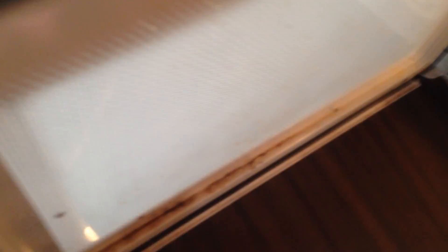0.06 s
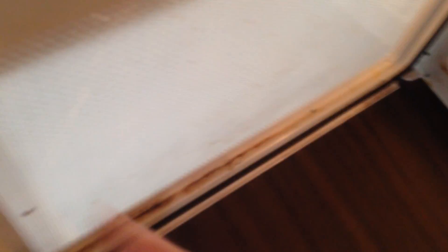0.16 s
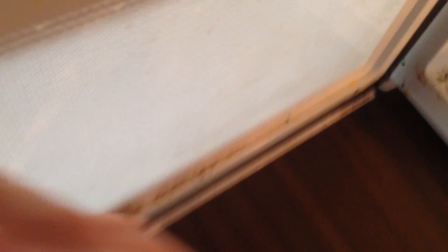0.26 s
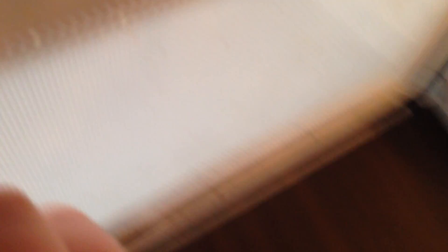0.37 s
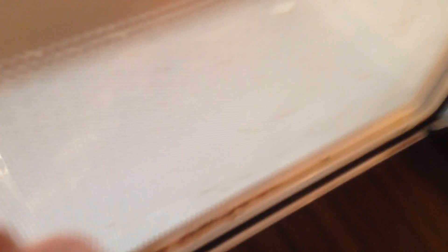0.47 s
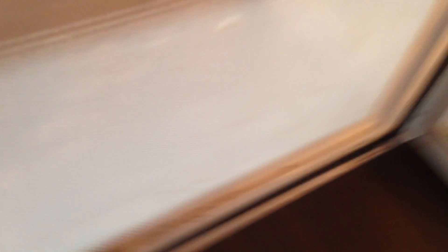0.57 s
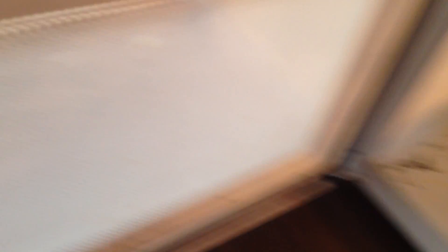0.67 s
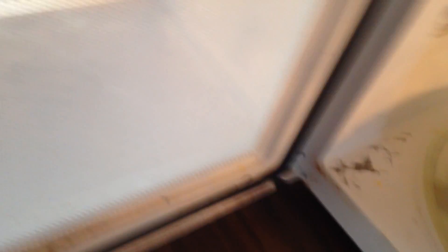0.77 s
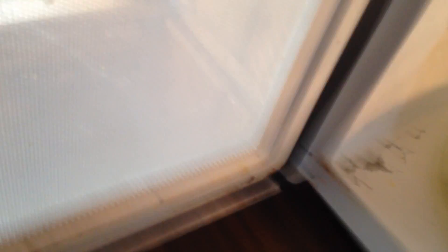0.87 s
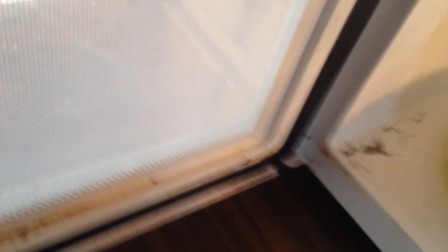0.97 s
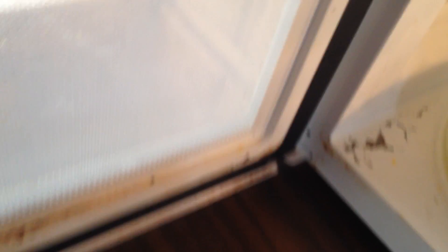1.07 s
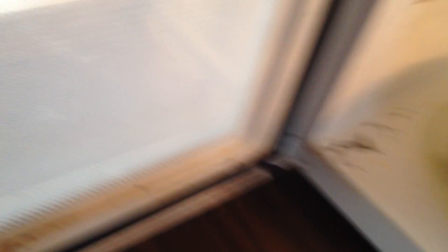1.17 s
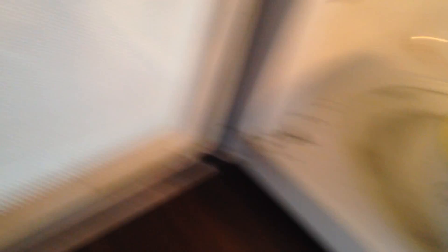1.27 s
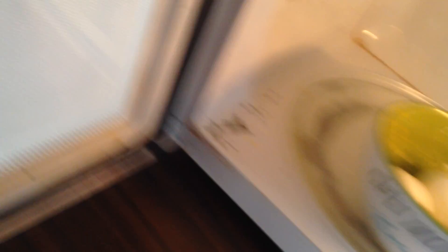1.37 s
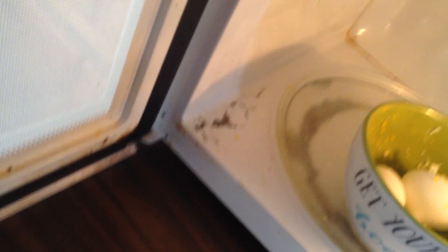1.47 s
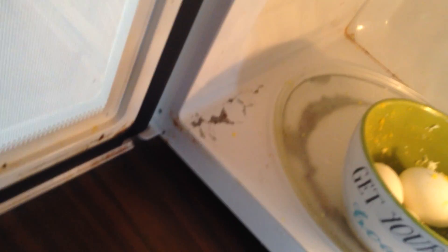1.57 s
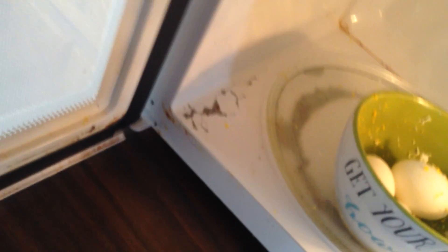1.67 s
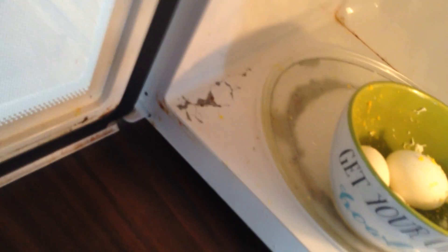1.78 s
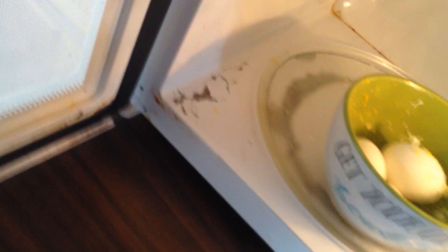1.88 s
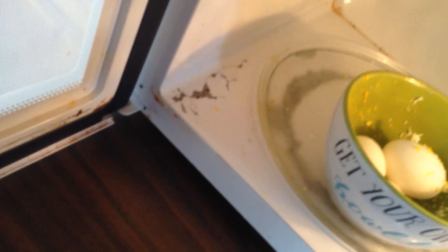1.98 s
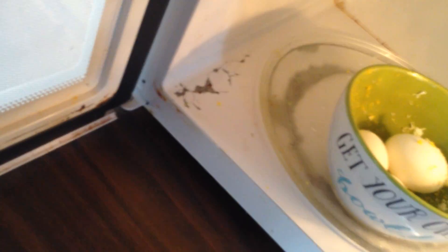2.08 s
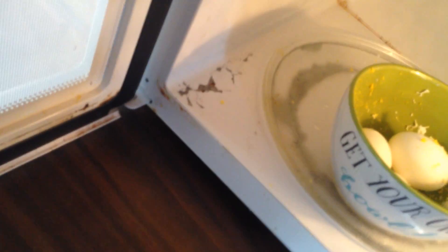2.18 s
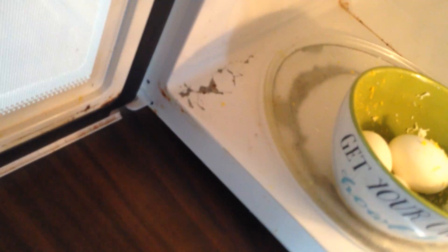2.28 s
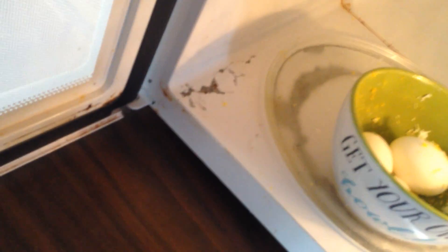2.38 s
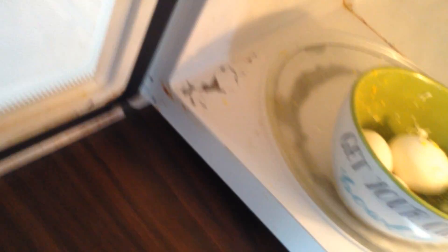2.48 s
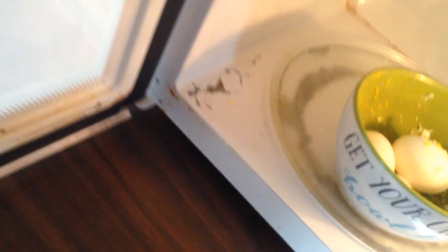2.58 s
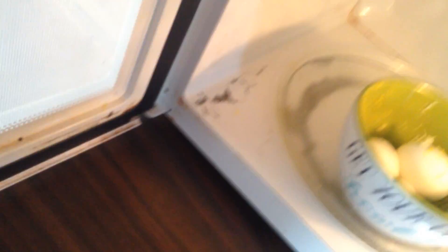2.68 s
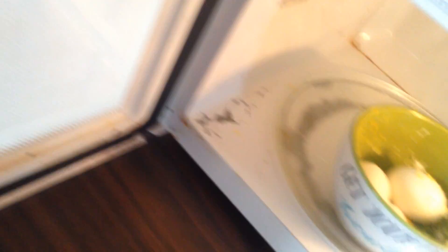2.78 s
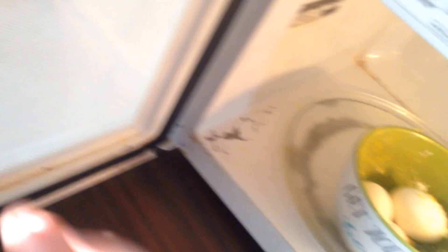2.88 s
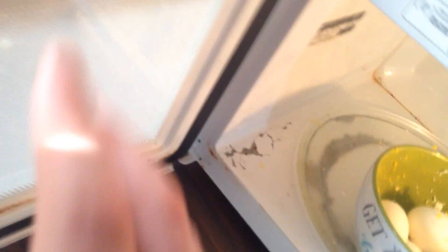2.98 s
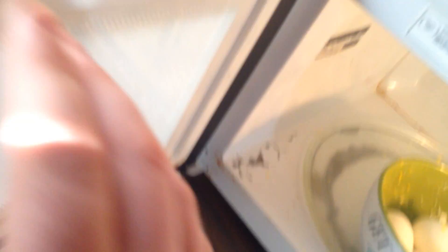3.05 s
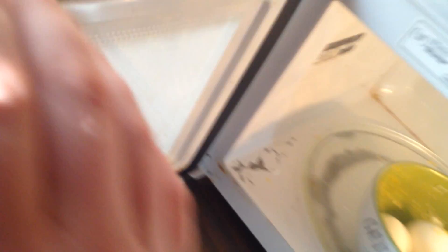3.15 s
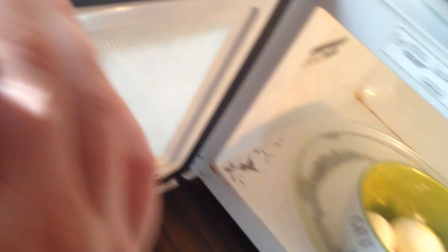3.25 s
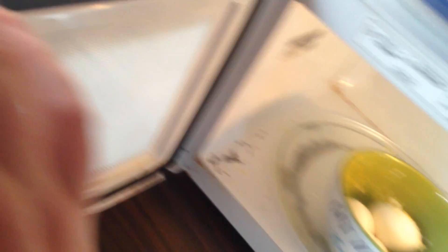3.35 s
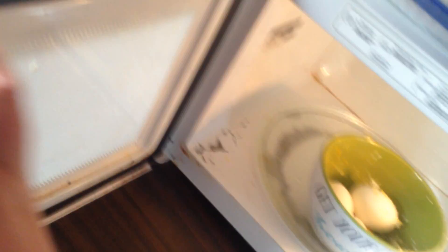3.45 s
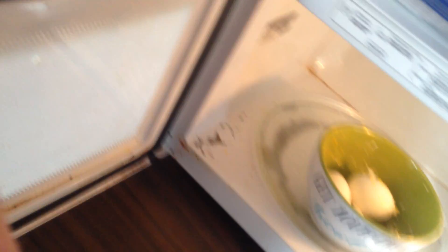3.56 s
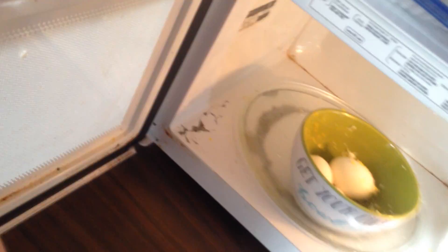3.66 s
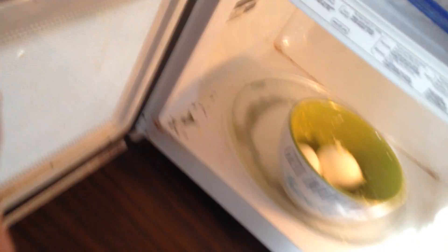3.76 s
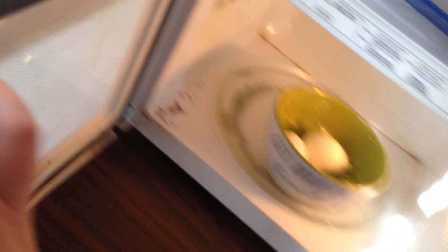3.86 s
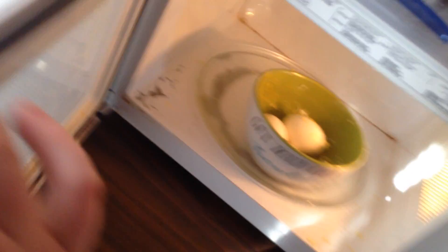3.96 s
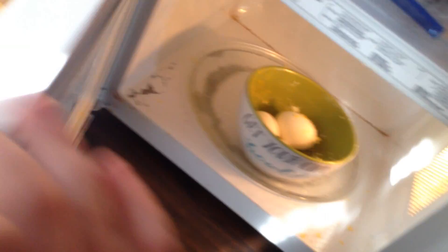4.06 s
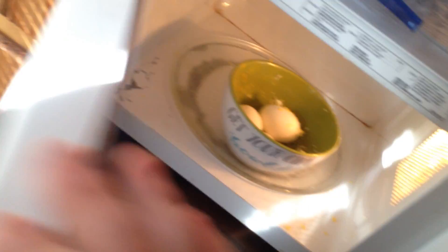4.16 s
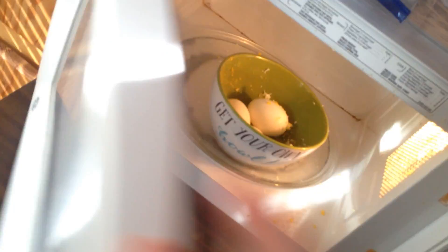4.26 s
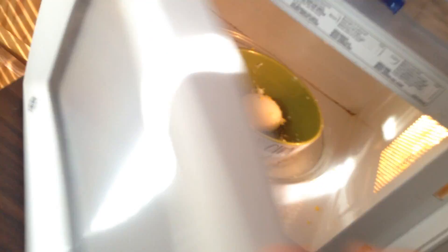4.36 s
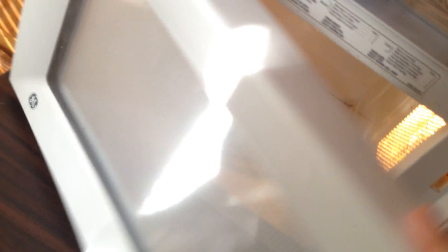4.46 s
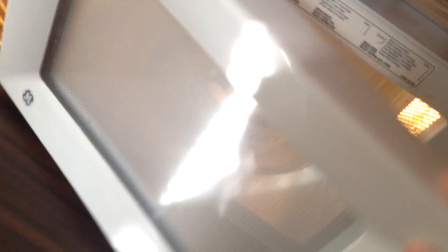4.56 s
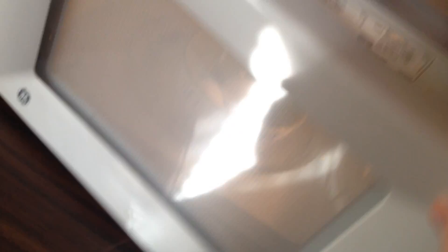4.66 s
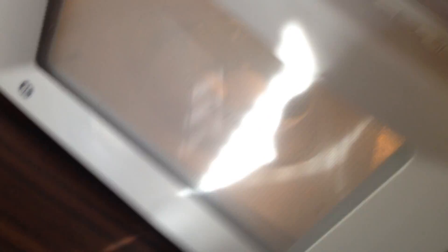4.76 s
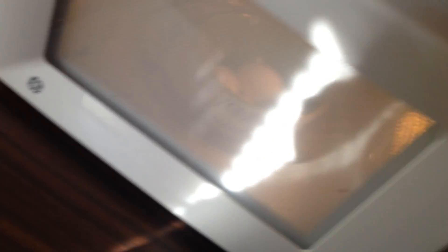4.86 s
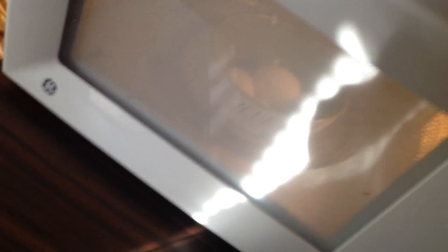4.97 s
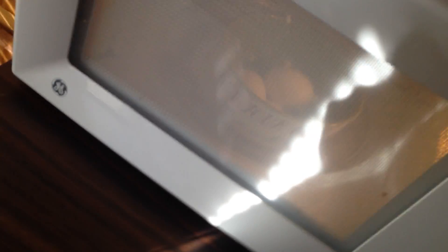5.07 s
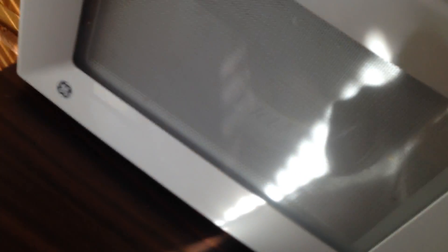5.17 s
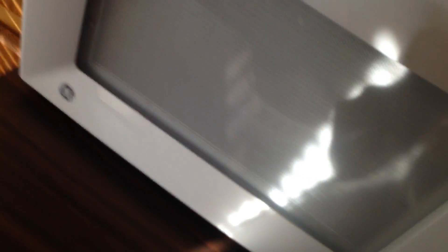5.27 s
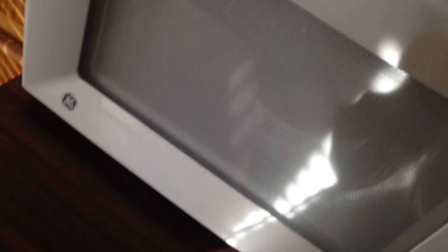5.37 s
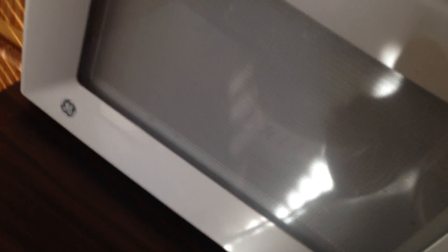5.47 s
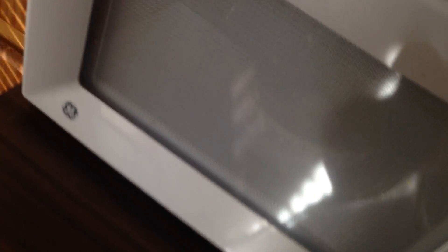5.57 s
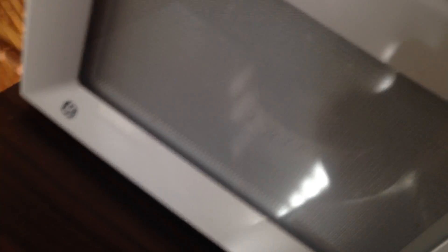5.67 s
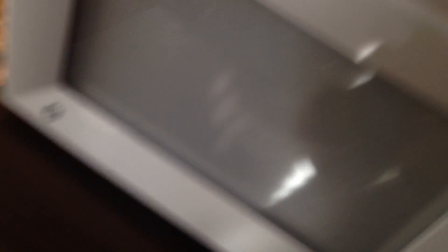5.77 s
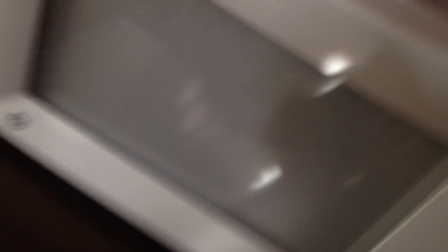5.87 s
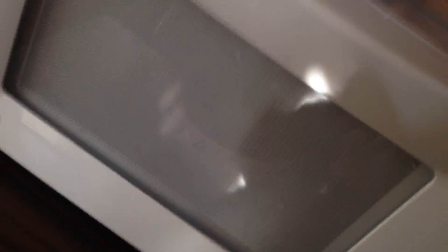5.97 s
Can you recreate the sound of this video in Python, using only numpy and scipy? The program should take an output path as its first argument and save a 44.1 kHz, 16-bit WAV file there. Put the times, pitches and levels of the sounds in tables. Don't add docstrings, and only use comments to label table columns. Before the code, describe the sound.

A quiet kitchen, heard close to a handheld microphone, with steady soft hiss, a faint low hum and uneven hand rumble. A light touch at 0.36 s precedes a fairly loud dull knock at 0.44, then a quick pair of brighter taps at 0.81 to 0.84. Near quiet follows, with barely audible rubbing. A soft knock and tick come at 2.3, a tap and faint hinge stutter at 2.6 to 2.8, and rubbing and a dull bump around 2.9 to 3.25. From 3.55 to 4.15 the hinge creaks in dry, low, rapid jerks, strongest at 3.8; a firm knock and tick end it near 4.18. Hooks bump and scrape at 4.96, and a rattle comes at 5.16. At 5.19 the door slams: several contacts within hundredths of a second, a hard crack, boxy steel ring and short low thump, gone within about half a second. Small ticks and bumps appear at 5.5 and 5.85 to 6.0.

```python
import sys
import numpy as np
from scipy import signal
from scipy.io import wavfile
from scipy.ndimage import uniform_filter1d

SR = 44100
rng = np.random.default_rng(int(sys.argv[2]) if len(sys.argv) > 2 else 0)


def nominal_scale(level):
    x = np.asarray(level, float) / 20
    return 10 ** x


def digitize_waveform(pressure):
    field = np.atleast_2d(pressure).T
    bounded = np.clip(field, -1, 1)
    quanta = np.round(bounded * 32767).astype(np.int16)
    wavfile.write(sys.argv[1], SR, quanta)


N = 266187
TIME = np.arange(N) / SR
BAND_EDGES_HZ = 22 * 2 ** np.arange(0, 9.7, 0.4)

# (time [s], cabinet level [dB], crack level [dB], direction [+1 or -1])
SLAM_CONTACTS = [
    (5.175, -46, -32, 1),
    (5.185, -22, -21, 1),
    (5.1885, -13.5, -12, -1),
    (5.1925, -16, -7, 1),
    (5.195, -16.5, -10, -1),
    (5.2005, -22, -15, 1),
    (5.2055, -22, -21, -1),
]
# (frequency [Hz], level [dB], t60 [s])
CABINET_MODES = [(71.4, -14, 0.33), (89.5, -18.5, 0.24), (103.9, -13.5, 0.14), (133.4, -9.5, 0.2),
                 (151.5, -15, 0.28), (182.3, -23.5, 0.35), (202, -17, 0.1), (219, -2.5, 0.1),
                 (242.8, -2, 0.35), (280, -7.5, 0.19), (302.4, -7, 0.15), (329, -13, 0.073),
                 (352.3, -4, 0.11), (424, -19.5, 0.12)]
# (frequency [Hz], level [dB], t60 [s])
LEAF_MODES = [(465, -13, 0.1), (524.3, -18, 0.2), (728.4, -3, 0.17), (787, -5, 0.049), (803, -34, .1),
              (1133, -41.5, 0.45), (1318, -11.5, 0.12), (1618, -37, 0.12), (1622, -20, 0.22),
              (2440, -18, 0.082), (2740, -18.5, 0.2), (3850, -28, 0.033), (6600, -26.5, 0.034),
              (8270, 2.5, 0.0041)]
PANEL_HZ = [108, 226, 262.5, 281, 305, 343, 366, 571, 727, 962]
# (level [dB], t60 [s])
PANEL_DECAYS = [(-50, 1.2), (-51, 1.3), (-46.5, 1.8), (-53, 1.2), (-52, .8), (-48, .7), (-53, .9),
                (-63, 1.3), (-68, .8), (-66, .65)]
# (frequency [Hz], level [dB per Hz])
CRACK_SPECTRUM = [(180, -21.5), (300, 3), (814, -6), (1120, -19.5), (3290, -9), (5900, -19), (8220, -17.5),
                  (13300, -26), (16000, -21.5)]
# (frequency [Hz], level [dB per Hz])
TAIL_SPECTRUM = [(190, -29), (330, 0.5), (653, -18), (1620, -18), (1760, -22), (1940, -21), (7100, -36),
                 (14500, -51.5), (16000, -74)]
# (frequency [Hz], t60 [s])
TAIL_T60 = [(300, 0.33), (700, 0.23), (2000, 0.17), (5000, .16), (12000, 0.13)]

# (frequency [Hz], level [dB], t60 [s])
HINGE_MODES = [(292, -21, 0.04), (329, -8.5, 0.065), (381.4, -10, 0.056), (781, -9, 0.023),
               (536, -8, 0.017), (950, -14.5, 0.0096), (1390, -17, 0.014), (1730, -15.5, 0.013),
               (2680, -14.5, 0.0095)]
# (start [s], end [s], level of the even stutter [dB])
SWINGS = [
    (2.595, 2.771, -53.5),
    (3.56, 3.669, -52),
    (3.831, 4.07, -48),
]
# (time [s], peak level [dB])
CATCHES = [
    (3.546, -45.5),
    (3.58, -50),
    (3.613, -46),
    (3.651, -44),
    (3.81, -37),
    (3.845, -44.5),
    (3.897, -43.5),
    (4.05, -53),
    (4.105, -41.5),
    (4.138, -49),
]

# (time [s], peak level [dB], brightness relative level [dB], centre frequency [Hz])
TAP = (-19, 0.13)
TAPS = [
    (0.355, -45, -11, 950),
    (0.807, -40.5, 2, 457),
    (0.838, -36.5, -2, 510),
    (2.575, -47.5, -12, 516),
    (2.922, -48.5, -25, 294),
    (5.898, -55, -15.5, 650),
    (6.007, -47.5, -7.5, 470),
]
KNOCK = (-8, 0.12)
KNOCKS = [
    (0.437, -28, -13.5, 650),
    (0.441, -30.5, -34, 298),
    (2.322, -48.5, -15, 630),
    (4.182, -38, -34, 815),
    (4.219, -48.5, -4.5, 363),
    (4.783, -56, -8, 290),
    (5.848, -56, -7.5, 594),
]
BUMP = (4.9, .08)
BUMPS = [
    (2.878, -61, -21, 298),
    (3.245, -44.5, -22, 587),
    (4.96, -41, 1.5, 296),
    (5.512, -48.5, -7.5, 296),
    (5.957, -48.5, -31, 576),
]
RATTLE = (-5, 0.37)
RATTLES = [
    (5.158, -28.5, -4, 300),
]
# (frequency [Hz], level [dB])
THUD_MODES = [(62, 2.5), (88, -9), (121, 1), (152, -4), (185, -4.5), (226, -9)]
# (frequency [Hz], level [dB per Hz])
CRUNCH_SPECTRUM = [(700, -27.5), (1500, 8.5), (3000, 3), (6000, -8), (14000, -26.5)]
# (time [s], frequency [Hz], level [dB], t60 [s])
LONE_MODES = [(.355, 1000, -46, .05), (.44, 224.5, -41, .25), (.452, 623, -35, .06),
              (0.439, 926, -36, .045), (0.807, 435, -56, .1), (0.839, 434, -56, .08),
              (0.861, 305.3, -54, .2), (0.84, 2720, -44.5, .04), (3.231, 131, -28, .06),
              (4.181, 918, -34, .04), (4.188, 151.6, -40.5, .2), (4.975, 121, -36, .2),
              (5.023, 124, -35, .2), (5.532, 105, -50, .2), (5.953, 173, -41, .06), (5.957, 690, -46, .04),
              (5.957, 520, -48, .04), (5.9, 2050, -65.5, .15), (4.926, 1800, -61, .08),
              (4.787, 830, -57, .05)]

# (peak time [s], rise [s], fall [s], peak level [dB], high part relative level [dB])
SLIDES = [
    (.37, .015, 0.2, -63.5, -5),
    (1.35, 0.18, 0.99, -75.5, -24),
    (2.598, 0.042, 0.13, -61.5, -16),
    (3.007, 0.13, 0.16, -61, -1.5),
    (3.18, 0.012, 0.053, -77.5, 8),
    (3.215, 0.038, 0.036, -63.5, 11.5),
    (3.66, .08, 0.16, -64, -7.5),
    (4.151, 0.03, 0.11, -54, -24),
    (4.187, 0.015, 0.072, -50, -26),
    (4.965, 0.0087, 0.041, -40, -2),
]
SHOVES = [
    (2.88, .04, .1, -69.5, -16),
    (3.19, 0.076, .2, -62, -1.5),
    (4.93, 0.18, .06, -71, 7.5),
    (4.998, 0.058, 0.2, -53, -6.5),
    (5.089, .04, 0.039, -69, 1),
    (5.162, .04, .03, -53.5, -10),
    (5.341, 0.016, .2, -61, -28),
]
STROKE_DB = 26
# (time [s], peak level [dB], centre frequency [Hz], top relative level [dB])
TICKS = [(2.3244, -58, 3470, -22), (2.58, -56.5, 2740, -28), (3.2178, -47.5, 3600, -12),
         (3.6868, -54.5, 2080, -50), (4.136, -39, 2230, -17.5), (4.2468, -55, 3740, -14),
         (4.5125, -58.5, 2150, -31), (4.7894, -59.5, 1750, -18), (0.3552, -52, 2100, -30),
         (4.183, -57, 1610, -35), (4.961, -55, 2920, -40), (4.967, -60, 2600, -26),
         (4.986, -51.5, 9500, -8), (.839, -46, 3700, -32), (.438, -49, 1890, -23),
         (5.155, -44, 2660, -32.5), (5.4616, -48.5, 2050, -26), (5.5213, -53.5, 1600, -52),
         (5.8468, -55, 6300, -24), (5.8992, -57, 2100, -22)]

# (frequency [Hz], level [dB per Hz])
AIR_SPECTRUM = [(120, -46.5), (200, -30.5), (249, 14), (298, -0.5), (385, -2.5), (575, -5), (1330, -12.5),
                (1450, -12), (3750, -10.5), (14700, -13), (15500, -17)]
# (frequency [Hz], level [dB per Hz])
RUMBLE_SPECTRUM = [(12, -46), (20, -21.5), (59, 0), (113, -10), (155, -19.5), (182, -17), (220, -38),
                   (250, -9.5), (320, -43.5), (550, -120)]
# (time [s], level [dB])
HANDLING = [(0.0, -54), (0.13, -65.5), (0.47, -56), (0.86, -69), (1.11, -58), (1.3, -65), (1.7, -68.5),
            (2.13, -66.5), (2.96, -69.5), (3.14, -71), (3.3, -57.5), (3.45, -67.5), (3.68, -57), (3.9, -66),
            (4.52, -65.5), (4.96, -69), (5.48, -59.5), (6.04, -72.5)]
# (time [s], level [dB])
JOLTS = [
    (5.01, -43),
    (5.189, -28.5),
]


def slam():
    out, t = np.zeros(N), TIME[:SR]
    start = SLAM_CONTACTS[0][0]
    clicks, crack = np.zeros(SR), np.zeros(SR)
    for s, cabinet_db, crack_db, direction in SLAM_CONTACTS:
        since = t - (s - start)
        age = np.abs(since)
        clicks[round((s - start) * SR)] = direction * nominal_scale(cabinet_db)
        crack += nominal_scale(crack_db) * (since > 0) * (1 - np.exp(-age / 0.00064)) * np.exp(-age / 0.0021)
    cabinet = sum(nominal_scale(mode_db) * ring(clicks, hz, t60) for hz, mode_db, t60 in CABINET_MODES + LEAF_MODES)
    cabinet = nominal_scale(-3.5) * filtered(cabinet, 95, "high")

    since = np.maximum(t - 0.012, 0)
    for hz, (panel_db, t60) in zip(PANEL_HZ, PANEL_DECAYS):
        beat_db = 4 * np.sin(2 * np.pi * (hz / 70 * since + rng.random()))
        cabinet += nominal_scale(panel_db - 60 * since / t60 + beat_db) * np.sin(2 * np.pi * hz * since)

    noise = list(bands(SR))
    sharp = crack * rms_one(sum(nominal_scale(at_hz(CRACK_SPECTRUM, hz)) * band for hz, band in noise))
    tail = np.zeros(SR)
    for hz, band in noise:
        decay = nominal_scale(at_hz(TAIL_SPECTRUM, hz) - 60 * (since - 0.04) / at_hz(TAIL_T60, hz))
        build_up = 1 - np.exp(-since / (0.0035 + 2.9 / hz))
        tail += decay * build_up * band[::-1]
    add(out, cabinet + nominal_scale(-1.0) * sharp + nominal_scale(-6.0) * tail, start)
    return out


def hinge():
    slip_s, jitter, spread_db = 0.0165, 0.15, 2
    chance = rng.standard_normal((40, 2))
    slips = []
    for start, end, swing_db in SWINGS:
        for s, (late, more) in zip(np.arange(start, end, slip_s), chance):
            slips.append((s + slip_s * jitter * late, swing_db + spread_db * more))
    s, level_db = np.transpose(slips + CATCHES)
    at = (s * SR).astype(int)
    out, scatter = np.zeros(N), rng.standard_normal((len(HINGE_MODES), 60))
    for (hz, mode_db, t60), row in zip(HINGE_MODES, scatter):
        clicks = np.zeros(N)
        clicks[at] = -nominal_scale(level_db + mode_db + 1.5 * row[:len(at)])
        sliding = np.roll(uniform_filter1d(np.abs(clicks), size=900), 400)
        drag = sliding * rng.standard_normal(N) * nominal_scale(26)
        out += ring(clicks + drag, hz, t60)
    out = filtered(out, 230, "high")
    return signal.lfilter([0.15], [1, -0.85], out)


def knocks():
    out, t = np.zeros(N), TIME[:SR // 4]
    hz = np.linspace(200, 3000, 140) * nominal_scale(0.082 * rng.standard_normal(140))
    rise = 1 - np.exp(-t / 0.00014)
    kinds = [(TAP, TAPS), (KNOCK, KNOCKS), (BUMP, BUMPS), (RATTLE, RATTLES)]
    blows = [(*kind, *row) for kind, rows in kinds for row in rows]
    for thud_db, t60, s, level_db, bright_db, centre_hz in blows:
        octaves = np.log2(hz / centre_hz)
        slope_db = np.where(octaves > 0, -11.0, 13.0)
        gains = nominal_scale(slope_db * octaves + 2.4 * rng.standard_normal(140))
        mode_t60 = t60 * (hz / 600) ** -0.5
        waves = np.sin(2 * np.pi * (hz[:, None] * t + rng.random((140, 1))))
        body = gains @ (nominal_scale(-60 * t / mode_t60[:, None]) * waves)

        thud = np.zeros(len(t))
        for low_hz, low_db in THUD_MODES:
            decay = nominal_scale(low_db + 2.2 * rng.standard_normal() - 60 * t / (1.9 * t60))
            thud += decay * np.sin(-2 * np.pi * low_hz * t)

        crunch = np.zeros(len(t))
        for band_hz, band in bands(len(t)):
            band_t60 = t60 * (band_hz / 1500) ** -0.45
            crunch += band * nominal_scale(at_hz(CRUNCH_SPECTRUM, band_hz) - 60 * t / band_t60)

        blow = peak_one(body) + nominal_scale(thud_db) * peak_one(thud) + nominal_scale(bright_db) * peak_one(crunch)
        add(out, nominal_scale(level_db) * rise * blow, s - 0.001)
    return out


def lone_modes():
    out, t = np.zeros(N), TIME[:SR // 2]
    for s, hz, level_db, t60 in LONE_MODES:
        decay = nominal_scale(level_db - 60 * t / t60) * (1 - np.exp(-t * hz))
        add(out, decay * np.sin(2 * np.pi * hz * t), s)
    return out


def rubs():
    lumps = nominal_scale(2.2 * rms_one(filtered(rng.standard_normal(N), 60, "low")))
    grain_sizes = nominal_scale(2.7 * np.minimum(rng.exponential(1, (3, N)), 4))
    grains = lumps * rng.standard_normal((3, N)) * grain_sizes
    dull = rms_one(filtered(grains[0], [250, 900], "band"))
    bright = rms_one(filtered(grains[1], [1500, 4200], "band"))
    hooks = rms_one(filtered(grains[1], [1100, 2700], "band"))
    shudder = rms_one(sum(nominal_scale(low_db) * ring(grains[2], low_hz, 0.086) for low_hz, low_db in THUD_MODES[1:]))
    out = np.zeros(N)
    for low_db, strokes, high in [(-2, SLIDES, bright), (11, SHOVES, hooks)]:
        for s, rise, fall, rub_db, high_db in strokes:
            pressure = nominal_scale(rub_db) * tent(s, STROKE_DB / rise, STROKE_DB / fall)
            out += pressure * (dull + nominal_scale(high_db) * high + nominal_scale(low_db) * shudder)
    return out


def ticks():
    out, t = np.zeros(N), TIME[:SR // 8]
    for s, level_db, centre_hz, top_db in TICKS:
        t60 = 0.041 + 33 / centre_hz
        shape = [(centre_hz / 4, -30), (centre_hz / 1.6, -9), (centre_hz, 0), (centre_hz * 1.5, -7), (15000, top_db)]
        burst = sum(nominal_scale(at_hz(shape, hz)) * band for hz, band in bands(len(t)))
        envelope = nominal_scale(-60 * t / t60) * (1 - np.exp(-t / 0.0015))
        add(out, nominal_scale(level_db) * peak_one(burst * envelope), s)
    return out


def kitchen(x):
    t = TIME[:SR // 2]
    echo = sum(band * nominal_scale(-60 * t / (0.21 * (hz / 500) ** -0.2)) for hz, band in bands(len(t)))
    echo = echo * (t > 0.004)
    return signal.fftconvolve(x, echo / np.sqrt(np.sum(echo ** 2)))[:N]


def background():
    lumps = rms_one(filtered(rng.standard_normal(N), 12, "low"))
    grip = nominal_scale(np.interp(TIME, *np.transpose(HANDLING)))
    for s, jolt_db in JOLTS:
        grip += nominal_scale(jolt_db) * tent(s, 807, 331.5)
    return nominal_scale(-67) * coloured(AIR_SPECTRUM) + coloured(RUMBLE_SPECTRUM) * grip * nominal_scale(0.83 * lumps)


def ring(clicks, hz, t60):
    r, w = nominal_scale(-60 / (t60 * SR)), 2 * np.pi * hz / SR
    return signal.lfilter([0, np.sin(w)], [1, -2 * r * np.cos(w), r * r], clicks + 1e-18)


def bands(size):
    white = rng.standard_normal((2, size))
    for k, (low, high) in enumerate(zip(BAND_EDGES_HZ, BAND_EDGES_HZ[1:])):
        yield np.sqrt(low * high), filtered(white[k % 2], [low, high], "band")


def coloured(spectrum):
    return rms_one(sum(nominal_scale(at_hz(spectrum, hz)) * band for hz, band in bands(N)))


def filtered(x, hz, kind):
    return signal.sosfilt(signal.butter(2, hz, kind, fs=SR, output="sos"), x)


def at_hz(points, hz):
    point_hz, value = np.transpose(points)
    return np.interp(np.log(hz), np.log(point_hz), value)


def tent(peak_s, rise_db_per_s, fall_db_per_s):
    return nominal_scale(-np.where(TIME < peak_s, rise_db_per_s, fall_db_per_s) * np.abs(TIME - peak_s))


def rms_one(x):
    return x / np.sqrt(np.mean(x ** 2) + 1e-20)


def peak_one(x):
    return x / np.abs(x).max()


def add(out, piece, s):
    i = round(s * SR)
    out[i:i + len(piece)] += piece[:N - i]


def scene():
    door = knocks() + lone_modes() + ticks() + hinge() + rubs()
    return (slam() + door + nominal_scale(-14.0) * kitchen(door) + background())[None]


def top_cut(x):
    return signal.sosfilt(signal.butter(12, 16260, fs=SR, output="sos"), x)


def record(dry):
    heard = filtered(dry, 60, "high")
    heard = signal.sosfilt(signal.ellip(10, 0.5, 70, 15300, fs=SR, output="sos"), heard)
    return top_cut(heard)


dry = scene()
out = record(dry)
digitize_waveform(out)
```